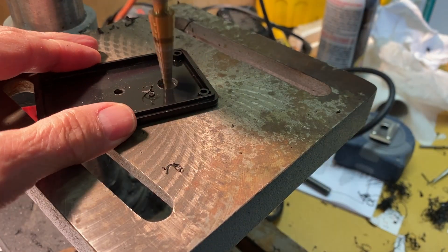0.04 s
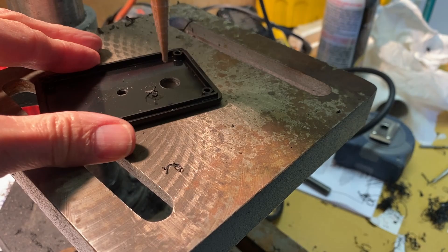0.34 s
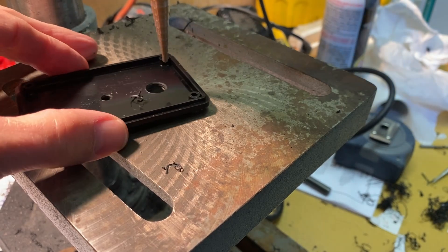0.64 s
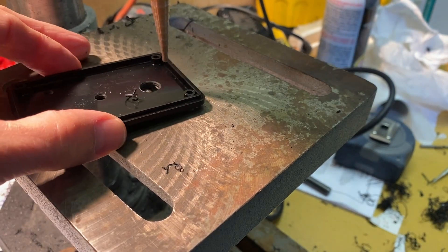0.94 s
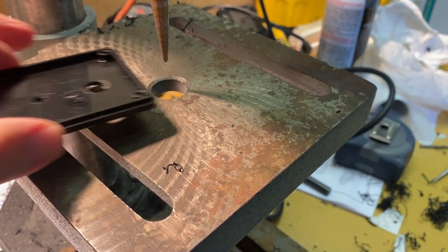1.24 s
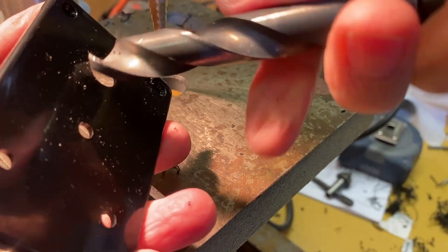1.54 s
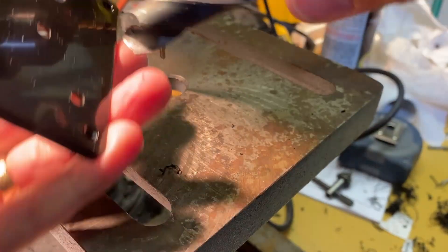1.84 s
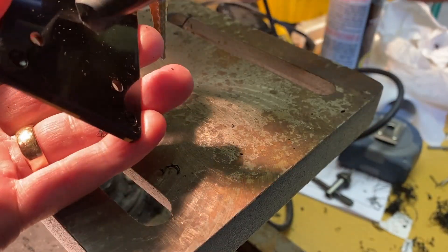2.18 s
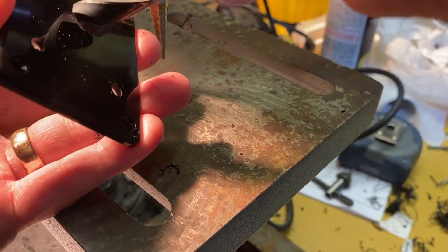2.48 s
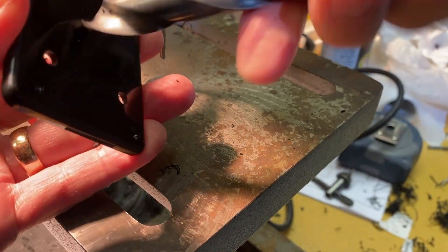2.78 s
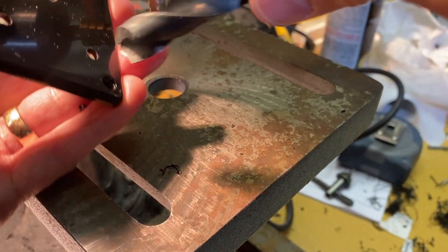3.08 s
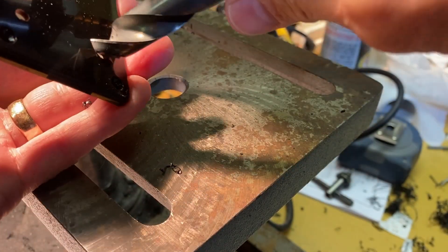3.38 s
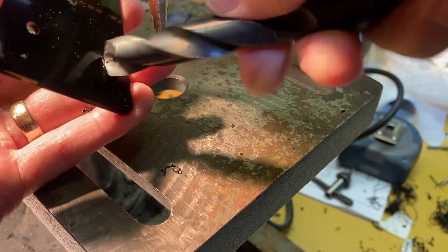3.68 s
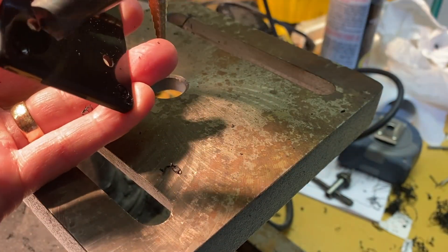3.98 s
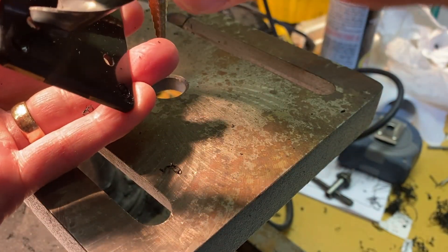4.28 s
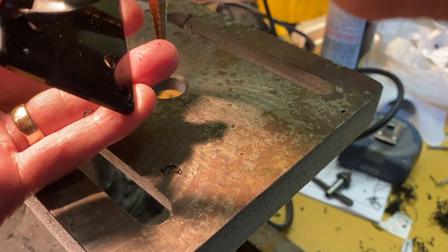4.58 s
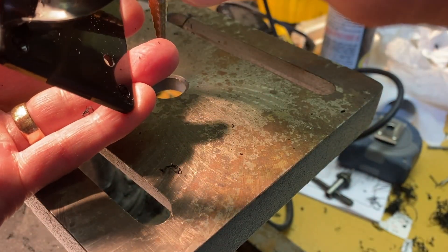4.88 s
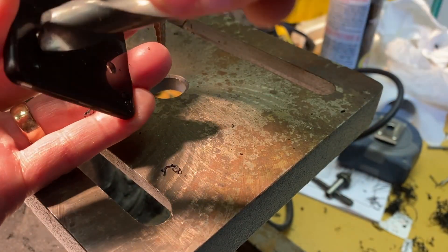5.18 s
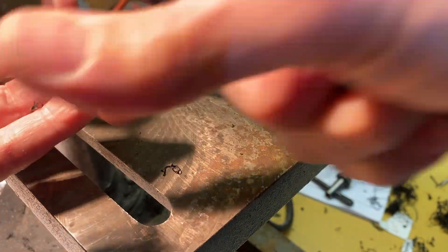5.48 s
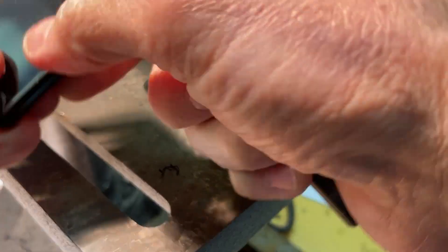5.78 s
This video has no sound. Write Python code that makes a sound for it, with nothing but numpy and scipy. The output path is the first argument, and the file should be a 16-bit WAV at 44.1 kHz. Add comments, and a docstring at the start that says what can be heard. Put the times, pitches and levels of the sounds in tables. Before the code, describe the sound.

Plastic crunches and snaps under a humming, rattling drill press, right by the microphone. After one loud crack the machine is switched off and coasts to a stop, leaving the low rumble of workshop ventilation. Sparse clicks, light scratches and tiny steel tinks follow as the hole is deburred by hand. Finally the steel bit lands on the iron table with a hard knock and a short tinkling bounce.

```python
"""Drilling a plastic lid in a workshop

Close to one microphone, a drill press hums and rattles while its step bit crunches through a plastic
lid; it is switched off and runs down. A twist bit, turned by hand in the hole, takes off the burr with
small ticks and scrapes, then is put down on the iron table, where it bounces and rings.
Bench and walls give short reflections, and a low ventilation rumble fills the room behind."""
import sys
import numpy as np
from scipy import signal
from scipy.fft import rfft, irfft
from scipy.io import wavfile
from scipy.ndimage import uniform_filter1d

SR = 44100
rng = np.random.default_rng(int(sys.argv[2]) if len(sys.argv) > 2 else 0)


def generate_wav(sig):
    """Save sig (samples, or channels by samples) to the path in sys.argv[1] as 16-bit PCM at SR."""
    pcm = np.round(np.clip(np.atleast_2d(sig).T, -1, 1) * 32767).astype(np.int16)
    wavfile.write(sys.argv[1], SR, pcm)


N = 261378
T = np.arange(N) / SR

# Spectra of the noises. Each row: frequency in Hz, relative level in dB.
ROOM_TONE = [(20, -17), (50, -12), (88, 0.5), (125, -6), (170, -14.5), (230, -22.5), (380, -19.5),
             (460, -25.5), (700, -25.5), (1000, -30), (2000, -44), (3700, -56.5), (5500, -53), (7500, -64),
             (10000, -56), (12500, -66), (16000, -69.5)]
BEARING_RATTLE = [(200, -13), (320, -18), (400, -0.5), (620, -3), (720, -4.5), (1050, -3.5), (1650, -11.5),
                  (1850, -9.5), (3000, -12), (4100, -25), (6000, -29.5), (11000, -36.5), (16000, -45.5)]
BELT_FLAP = [(25, -39), (45, -18.5), (65, -24), (88, -2.5), (118, 5), (135, 2), (153, 8), (174, 2.5),
             (195, -9), (222, 0.5), (250, -4), (275, -8), (320, -9), (400, -25.5), (800, -55.5)]
CHIP_SPECTRUM = [(300, -18.5), (700, -5), (1500, -1.5), (3000, 10), (4500, -2), (6800, 2), (8500, 4.5),
                 (10800, 4), (13000, -2), (16000, -4.5)]
BURR_SPECTRUM = [(800, -25), (1600, 2.5), (2250, 5.5), (3000, 0), (3800, -1.5), (5500, -5.5), (8000, -0.5),
                 (10500, 2.5), (15000, -4), (16000, -7)]

# Resonances that are rattled or rubbed. Each row: frequency in Hz, width in Hz, relative level in dB.
PRESS_FRAME = [(379, 17, 1.5), (508.8, 33, 7), (740, 18, 2.5), (916, 19, 5), (1133, 13, -6),
               (1289.6, 36, -1.5), (1370, 40.4, -4.5), (1430, 19, -1), (1590, 89, -1), (1656, 70, -2),
               (1875, 26, -16.5), (2020, 17, -21), (2590, 30, -20.5), (3790, 40, -27)]  # column, table and belt guard
STEP_BIT = [(4920, 160, -5), (8900, 240, 2.5), (10320, 110, 2.5), (12430, 320, -2), (13300, 274, -4)]
PRESSED_LID = [(460, 140, 2), (610, 142.7, -2), (756, 35, 5), (914.4, 180, -8.5)]  # held flat on the table
RUBBED_LID = [(2275, 15, 3), (2420, 67, -2.5), (3586, 24, -3.5), (4450, 60, -11.5), (6890, 67, -9),
              (8400, 200, 2), (9400, 100, -7.5), (10180, 210, 6), (12350, 150, -3.5), (12980, 190, -4),
              (14090, 170, -3.5)]  # under the hand-turned bit

# Modes that are struck. Each row: frequency in Hz, relative level in dB, 60 dB decay time in seconds.
HOLE_RIM = [(1980, -2.5, .025), (3600, -3.5, 0.017), (3730, -4, .014), (4440, -1, 0.011), (8300, -5, 0.012),
            (8800, -13.5, .01), (11960, -0.5, .01), (14200, 0.5, .01)]
HELD_LID = [(1463, -2.5, 0.089), (1796, -6, 0.045), (2237, 5.5, 0.014), (2580, -0.5, 0.021),
            (2970, -9, 0.012), (3480, 0, 0.013), (3890, -8.5, 0.016), (4500, -16, 0.02), (5030, -6, .02)]  # damped by the fingers
HELD_BIT = [(6630, -8, 0.1), (8070, -15, 0.04), (10350, 0, 0.031), (12000, -21, 0.077)]
FREE_BIT = [(3170, -5.5, 0.13), (4800, -1, 0.047), (8340, 4.5, 0.031), (10450, -6, 0.081),
            (13140, -22, .06)]
BIT_ON_TABLE = [(790, -2.5, 0.03), (865, -3, 0.034), (1195, -5, 0.025), (1340, 4, 0.036), (1378, 4.5, .048),
                (1985, -20, 0.06), (2780, -8, .02), (3080, -5, 0.018), (3425, -1, 0.02), (3500, -4, .026),
                (4540, -16, .022), (4845, -14, 0.024), (5780, -18, 0.018), (7480, -19, .02),
                (8850, -10, 0.01), (9550, -12, .013), (10650, -7, .011), (12800, -13, .01)]

# The course of the mains hum. Each row: time in seconds, level in dB.
HUM_LEVELS = [(0.03, -27.5), (.095, -38), (.14, -38), (.185, -28.5), (.31, -31), (.4, -29), (.48, -25),
              (.6, -30), (.66, -25), (.85, -29), (.94, -25)]
# Motor and bearing tones. Each row: frequency in Hz, relative level in dB.
MOTOR_TONES = [(239.7, -6.5), (359.6, -14.5), (479.2, -8), (563.5, -11), (629, -11.5), (746, -13.5),
               (805, -16), (868, -16), (912, -16), (987.5, -14.5), (1134, -15), (1278, -15.5), (1462, -17),
               (1613.8, -10), (2020, -21.5), (2752, -24.5)]
# The flute bites into the lid. Each row: start in seconds, length in seconds, level in dB,
# chatter against the scrape in dB.
BITES = [(.001, 0.045, -23.5, -3.5), (0.034, 0.08, -26, -5), (0.146, 0.03, -30.5, 2.5),
         (0.183, 0.037, -41.5, 8), (0.226, 0.13, -38.5, 4.5), (0.346, 0.054, -33.5, 1.5),
         (0.487, 0.052, -38, 0), (0.637, 0.041, -40.5, 4.5), (0.722, 0.052, -40.5, 2),
         (0.768, 0.061, -27, -1)]
# The largest chips snap off. Each row: start in seconds, relative level in dB.
CHIP_SNAPS = [(.0144, -17.5), (.0573, -19), (.0732, -11.5), (.148, -26.5), (.2004, -24), (.2543, -34),
              (.321, -24), (.368, -19), (.4868, -27), (.5097, -31), (.5665, -25.5), (.5915, -28),
              (.6255, -26), (.7168, -25), (.7472, -20.5), (.7515, -29), (.8345, -33), (.849, -26.5),
              (.8644, -31), (.871, -23), (.8874, -17.5), (.8888, -14.5), (.9725, -35), (.986, -33)]
# The rim cracks as the step bit lets go. Each row: start in seconds, peak in dB.
RIM_CRACKS = [(0.887, -29), (0.8889, -8.5)]
# An edge catches on the lid. Each row: start in seconds, relative scratch level in dB, lid peak in dB,
# favoured pitch in Hz, nominal scratch length in seconds, bit peak in dB.
CATCHES = [(.988, -49, -27, 2200, 0.016, -80), (1.102, -37, -37.5, 2200, 0.0068, -77),
           (1.164, -55, -43, 2540, 0.025, -87), (1.187, -43, -57, 2600, .006, -75),
           (1.329, -51, -47.5, 2100, 0.017, -80), (1.8157, -53, -43, 3530, 0.013, -43),
           (1.823, -58, -43, 3500, 0.0049, -61), (1.9355, -48, -49.5, 2620, 0.021, -45),
           (1.946, -53, -46.5, 1800, 0.02, -58), (2.4565, -29.5, -57, 4000, 0.0018, -75),
           (2.552, -24.5, -39.5, 2070, 0.0027, -70), (2.556, -47, -63, 2100, 0.0026, -75),
           (2.699, -56, -52, 2010, 0.044, -80), (2.737, -55, -60, 2380, 0.052, -80),
           (2.796, -59, -53, 2000, .015, -66), (2.807, -52, -52, 2780, 0.017, -70),
           (2.883, -68, -51.5, 2800, 0.023, -56.5), (2.891, -70, -48, 1590, 0.024, -62),
           (3.365, -51.5, -53, 2700, 0.016, -80), (3.63, -36, -35.5, 2400, 0.0032, -74),
           (3.633, -40, -47.5, 2230, .005, -75), (3.727, -60, -60, 2200, 0.017, -80),
           (3.743, -64, -61, 2300, 0.011, -80), (3.865, -66, -54.5, 2700, 0.01, -80),
           (5.061, -74, -51.5, 2500, 0.025, -66), (5.127, -34, -58, 2200, 0.0024, -78),
           (5.144, -80, -54.5, 2640, 0.014, -80), (5.168, -50, -70, 4000, .004, -75),
           (5.62, -47, -50, 3300, 0.023, -69)]
# Strokes of the hand-held bit. Each row: start in seconds, length in seconds, level in dB,
# rasp pitch in Hz, rasp against the scrape in dB.
STROKES = [(1.66, .2, -87, 2190, -10), (2.482, 0.22, -77.5, 3820, -4), (2.678, 0.14, -72.5, 2030, 0.5),
           (3.505, 0.16, -75.5, 2230, 1), (3.628, 0.086, -69, 2220, -6), (3.769, 0.049, -77, 2200, -13),
           (4.997, 0.47, -79, 2630, -18), (5.204, 0.043, -79, 8500, 2), (5.315, .1, -85, 2300, -6),
           (5.473, 0.56, -78, 3170, -5)]
# The tip slips off the edge. Each row: start in seconds, level in dB, favoured pitch in Hz.
TINKS = [(2.456, -57, 8200), (2.552, -51, 5000), (5.126, -48, 8000), (5.22, -59, 8200), (5.231, -61, 8200)]
# The bit lands on the table. Each row: start in seconds, relative levels of crack, knock and free ring
# in dB, rise time in seconds, treble limit of the knock in Hz.
LANDINGS = [(5.6398, -24, -6.5, -50, .0002, 9000), (5.6492, -37, -27, -56.5, .0003, 9000),
            (5.6548, -47, -17, -65, .0005, 4500), (5.6622, -41, -10.5, -62, .001, 3200),
            (5.7072, -47, -62, -43, .0005, 9000), (5.7743, -46, -54, -48, .0005, 6000),
            (5.792, -64, -70, -56, .0005, 6000), (5.8218, -57, -60, -58, .0005, 6000),
            (5.8947, -59, -80, -68, .0005, 6000)]

HUM_HZ = 119.8  # twice the mains frequency
THROUGH_S, SETTLE_T60_S = 0.085, 1  # the first step of the bit breaks through
PUSH_S = 0.81  # the bit leans hardest on the lid
OFF_S, STOP_S, MOTOR_T60_S = 0.945, 1.505, 0.47  # power goes off, then the spindle stops


def amp(db):
    return 10 ** (np.asarray(db) / 20)


def unit(x):
    """Scale to rms 1."""
    return x / np.sqrt(np.mean(x ** 2))


def fade(t, t60):
    return np.exp(-np.log(1000) * t / t60)


def hold(until_s, t60):
    """Gain 1 up to a moment, then a steady decay."""
    return fade(np.maximum(T - until_s, 0), t60)


def arch(start, length, sharpness):
    """Pressure that swells and fades over one bite or stroke."""
    return np.sin(np.pi * np.clip((T - start) / length, 0, 1)).clip(0) ** sharpness


def add(out, start, x):
    """Mix x in at a time in seconds."""
    i = max(int(start * SR), 0)
    out[i:i + len(x)] += x[:N - i]


def walk(rate):
    """Random levels held 1 / rate seconds and smoothed twice; spread near 1."""
    span = int(SR / rate)
    steps = rng.standard_normal(N)[np.arange(N) // span]
    return 1.2 * uniform_filter1d(uniform_filter1d(steps, span), span)


def grains(rate, spread_db):
    """Tiny impacts at random moments and of random sizes."""
    hits = (rng.random(N) < rate / SR) * rng.choice([-1, 1], N)
    return unit(hits * amp(spread_db * np.clip(rng.standard_normal(N), -2, 2)))


def lowpass(x, hz):
    return signal.sosfilt(signal.butter(1, min(hz, SR / 3), fs=SR, output="sos"), x)


def highpass(x, hz):
    return signal.sosfilt(signal.butter(2, hz, "high", fs=SR, output="sos"), x)


def band(x, hz, width_hz):
    """A single resonance, gain 1 at its centre."""
    return signal.lfilter(*signal.iirpeak(hz, hz / width_hz, SR), x)


def steep_band(x, hz, width_hz):
    return band(band(x, hz, width_hz), hz, width_hz)


def colour(x, spectrum):
    """Causal filter of unit power gain through (Hz, dB) points."""
    hz, db = np.transpose(spectrum)
    size = 8192
    gain = amp(np.interp(np.log(np.fft.rfftfreq(size, 1 / SR) + 1), np.log(hz), db))
    cepstrum = irfft(np.log(gain))[:size // 2]
    response = irfft(np.exp(rfft(2 * cepstrum, size)))
    return signal.fftconvolve(x, response / np.linalg.norm(response))[:N]


def resonate(x, modes):
    """Drive a set of resonances; neighbours move in opposite directions."""
    return unit(sum((-1) ** k * amp(db) * band(x, hz, width) for k, (hz, width, db) in enumerate(modes)))


def ring(modes, centre_hz=None, detune=0.):
    """One blow, peak 1; the contact point favours modes near centre_hz, and the grip detunes them."""
    t = T[:SR // 2]
    y = np.zeros(len(t))
    for hz, db, t60 in modes:
        size, shift = rng.standard_normal(2)
        share = 1 / (1 + np.log2(hz / centre_hz) ** 2 / 0.095) if centre_hz else 1
        y += share * amp(db + size) * fade(t, t60) * np.sin(2 * np.pi * hz * (1 + detune * shift) * t)
    return y / np.abs(y).max()


def crack(t60, rise_s):
    """A noise burst with a short rise and a peak near 1."""
    t = T[:SR // 2]
    shape = fade(t, t60) * (1 - np.exp(-t / rise_s))
    return rng.standard_normal(len(t)) * shape / shape.max() / 2


def workshop():
    """Room tone behind the bench: ventilation rumble, a room resonance in the bass and a faint hiss."""
    air = unit(colour(rng.standard_normal(N), ROOM_TONE))
    boom = unit(steep_band(rng.standard_normal(N), 85.2, 22))
    duct = unit(band(rng.standard_normal(N), 380, 23))
    return amp(-48.5 + 0.42 * walk(2.6)) * (amp(1.5) * air + amp(-13) * boom + amp(-18) * duct)


def motor_gain():
    """The motor is slightly louder during the breakthrough and dies away after the switch."""
    return amp(-30.5 + 2 * hold(THROUGH_S, SETTLE_T60_S)) * hold(OFF_S, MOTOR_T60_S)


def motor():
    """Mains hum that swells and sags, with motor and bearing tones that waver under load."""
    hum = np.sin(2 * np.pi * HUM_HZ * T + 0.25 * walk(14))
    hum *= amp(np.interp(T, *np.transpose(HUM_LEVELS)) + 0.7 * walk(24))
    tones = np.zeros(N)
    for hz, db in MOTOR_TONES:
        level = amp(db + 2.5 * walk(30))
        waver = (0.22 + hz / 8000) * walk(18)
        tones += level * np.sin(2 * np.pi * hz * T + waver + 2 * np.pi * rng.random())
    return np.sqrt(2) * (hum * hold(OFF_S, MOTOR_T60_S) + amp(-3) * tones * motor_gain())


def bearing_knocks():
    """Dense small knocks in bearings and pulleys, pulsed by the mains while the motor is on."""
    mains = 1 + 0.5 * np.sin(2 * np.pi * HUM_HZ * T) * (T < OFF_S)
    return grains(rate=5000, spread_db=6) * mains * amp(1.5 * walk(70))


def running(level_db, fall_db, load_db, coast_throb_db):
    """Gain of a part of the press: it throbs, rises under load, falls while coasting and then stops."""
    lap_s, crest_s, powered_throb_db = 0.1674, 1.017, 1.5  # probably one throb per lap of the belt
    coasting = np.clip((T - OFF_S) / (STOP_S - OFF_S), 0, 1) ** 0.55  # falls fastest at first
    load = np.exp(-((T - PUSH_S) / 0.023) ** 2)
    depth_db = powered_throb_db + (coast_throb_db - powered_throb_db) * coasting
    throb_db = depth_db * np.cos(2 * np.pi * (T - crest_s) / lap_s)
    return amp(level_db + load_db * load + throb_db - fall_db * coasting) * hold(STOP_S, t60=0.14)


def press():
    """Bearings hiss and rattle the frame while the belt flaps; all die away as the spindle slows."""
    rattle = unit(colour(bearing_knocks(), BEARING_RATTLE))
    rattle *= running(-33.5, fall_db=36, load_db=5, coast_throb_db=4.5)
    frame = resonate(bearing_knocks(), PRESS_FRAME)
    frame *= running(-32.5, fall_db=21.5, load_db=10.5, coast_throb_db=2)
    belt = unit(colour(grains(rate=500, spread_db=-0.5), BELT_FLAP))
    belt *= running(-30.5, fall_db=15, load_db=1.5, coast_throb_db=0.5)
    hiss = unit(steep_band(rng.standard_normal(N), 8700, 6000))
    hiss *= running(-67, fall_db=7.5, load_db=9, coast_throb_db=1.5)
    return rattle + frame + belt + hiss


def fractures(rate=230, jitter=0.28, spread_db=3.5):
    """Plastic breaks in a quick, uneven series: time since the latest break, and its dying force."""
    spacing, size = rng.standard_normal((N // 100, 2)).T
    gaps = np.exp(jitter * spacing) / rate
    starts = np.cumsum(gaps) - gaps
    latest = np.searchsorted(starts, T, "right") - 1
    age = T - starts[latest]
    return age, unit(amp(spread_db * np.clip(size[latest], -2, 1)) * fade(age, t60=0.012))


def zip_tone(age, start_hz=14500, end_hz=10300, fall_s=0.0017):
    """Bending waves bring the highest notes first, so each break is followed by a short falling zip."""
    hz = (end_hz + (start_hz - end_hz) * np.exp(-age / fall_s)) * (1 + 0.027 * rng.standard_normal())
    return np.sin(2 * np.pi * np.cumsum(hz) / SR)


def cutting():
    """The step bit crunches and rubs, the lid drums, and the chatter sinks as the hole opens."""
    squeak_hz, rasp_hz, sink_s = 5400, 2000, 0.12
    slips = grains(rate=1700, spread_db=4.5)
    age, force = fractures()
    crunch = force * grains(rate=14000, spread_db=1)
    scrape = amp(-2.5) * unit(colour(crunch, CHIP_SPECTRUM)) + amp(-5.5) * resonate(crunch, STEP_BIT)
    scrape += amp(-4) * force * zip_tone(age)
    bites = np.zeros(N)
    for start, length, db, chatter_db in BITES:
        hz = rasp_hz + (squeak_hz - rasp_hz) * np.exp(-(start + length / 2) / sink_s)
        chatter = unit(steep_band(crunch + slips, hz, width_hz=1300))
        bites += amp(db) * arch(start, length, sharpness=1.1) * (scrape + amp(chatter_db) * chatter)
    rubbing = amp(-24.5) * unit(colour(slips, CHIP_SPECTRUM)) + amp(-29) * resonate(slips, STEP_BIT)
    rubbing *= amp(2.8 * walk(60)) * motor_gain()
    drumming = amp(-25) * resonate(slips, PRESSED_LID) * hold(THROUGH_S, SETTLE_T60_S)
    return bites + rubbing + drumming


def snaps():
    """Single chips break off with a crack and a zip; the rim of the hole rings as the bit lets go."""
    cracks, notes = np.zeros((2, N))
    t = T[:SR // 2]
    small_starts = 0.56 * rng.random(30)  # small chips fly early in the cut
    small_db = -32.5 + 3.5 * rng.standard_normal(30)
    for start, db in [*CHIP_SNAPS, *zip(small_starts, small_db)]:
        add(cracks, start, amp(db - 5.5) * crack(t60=0.023, rise_s=0.0003034))
        add(notes, start, amp(min(db, -21) - 8) * fade(t, t60=0.012) * zip_tone(t))
    for start, db in RIM_CRACKS:
        add(notes, start, amp(db) * ring(HOLE_RIM))
    return colour(cracks, CHIP_SPECTRUM) + notes


def table_ring():
    """The last hard bite leaves the iron table ringing on one wavering note."""
    note = np.sin(2 * np.pi * 869 * (T - PUSH_S) + 0.45 * walk(20))
    return amp(-32 + 2 * walk(30)) * note * (T > PUSH_S) * hold(PUSH_S, t60=1.2)


def catches():
    """The edge catches: a scratch shakes lid and bit. When the tip slips off, the steel tinks."""
    contact, body = np.zeros((2, N))
    for start, scratch_db, lid_db, hz, length, bit_db in CATCHES:
        jolt = crack(t60=2 * length, rise_s=0.00015)
        lid = signal.fftconvolve(jolt, ring(HELD_LID, centre_hz=hz, detune=0.006))
        scratch = crack(t60=2.9 * length, rise_s=0.00022)
        scratch -= lowpass(scratch, 18 / length)  # briefer scratches are thinner
        add(contact, start, amp(scratch_db - 7.5) * scratch)
        add(body, start, amp(lid_db) * lid / np.abs(lid).max())
        add(body, start, amp(bit_db) * ring(HELD_BIT))
    finger_damping = fade(T[:SR // 2], t60=0.027)
    for start, db, hz in TINKS:
        add(body, start, amp(db) * ring(FREE_BIT, centre_hz=hz) * finger_damping)
    return colour(contact, BURR_SPECTRUM) + body


def deburring(drag_db=4.5):
    """The hand-turned edge drags unevenly over the burr, each stroke rasping at its own pitch."""
    slips = grains(rate=1800, spread_db=-0.5) * amp(drag_db * walk(50))
    push = lowpass(slips, 1483)  # slow rubbing drives mainly the low resonances
    scrape = amp(-0.6) * colour(slips, BURR_SPECTRUM) + amp(-6.5) * resonate(push, RUBBED_LID)
    out = amp(-93.5) * scrape  # the resting bit barely whispers
    for start, length, db, hz, rasp_db in STROKES:
        rasp = unit(steep_band(slips, hz, 0.15 * hz)) * amp(drag_db * walk(60))
        out += amp(db) * arch(start, length, sharpness=0.43) * (scrape + amp(rasp_db) * rasp)
    return out


def put_down():
    """The steel bit knocks on the table, bounces, then tinkles and sings faintly as it slides to rest."""
    cracks, knock, thud, free, slide = np.zeros((5, N))
    t = T[:SR // 2]
    for start, crack_db, knock_db, ring_db, rise_s, contact_hz in LANDINGS:
        rise = 1 - np.exp(-t / rise_s)
        knock *= hold(start, t60=0.007)  # a new contact chokes the knock before it
        add(cracks, start, amp(crack_db) * crack(t60=0.014, rise_s=0.00012))
        add(knock, start, amp(knock_db) * lowpass(ring(BIT_ON_TABLE, detune=0.002), contact_hz) * rise)
        add(thud, start, amp(knock_db - 15) * crack(t60=0.059, rise_s=0.00043))
        add(free, start, amp(ring_db) * ring(FREE_BIT) * rise)
        add(slide, start, amp(ring_db - 26) * fade(t, t60=0.19))
    # rubbing damps the free modes while it keeps them ringing
    rubbed_modes = [(hz, 60, db) for hz, db, _ in FREE_BIT]
    sliding = resonate(grains(rate=300, spread_db=4), rubbed_modes) * slide
    body = knock + free * amp(2 * walk(150)) + colour(cracks, CHIP_SPECTRUM) + sliding
    # so small a body radiates little bass; the table adds a dull thud
    return highpass(body, 600) + steep_band(thud, 260, 330)


def room(x, t60, wet_db):
    """Short, dull reflections from bench and walls reach the microphone just after the direct sound."""
    t = T[:SR // 2]
    tail = signal.lfilter([1], [1, -0.5], rng.standard_normal(len(t))) * fade(t, t60) * (t > 0.004)
    return x + amp(wet_db) * signal.fftconvolve(x, tail / np.linalg.norm(tail))[:N]


def scene():
    """The work at the press up close, the workshop behind it, in mono."""
    near = motor() + press() + table_ring() + cutting() + snaps() + deburring() + catches() + put_down()
    return (room(near, t60=0.079, wet_db=-12) + workshop())[None]


def record(dry):
    """The microphone loses the deepest bass, and the top is cut steeply."""
    top_cut = signal.ellip(10, 0.2, 80, 16100, fs=SR, output="sos")
    return signal.sosfilt(top_cut, highpass(dry, 25))


dry = scene()
out = record(dry)
generate_wav(out)
```